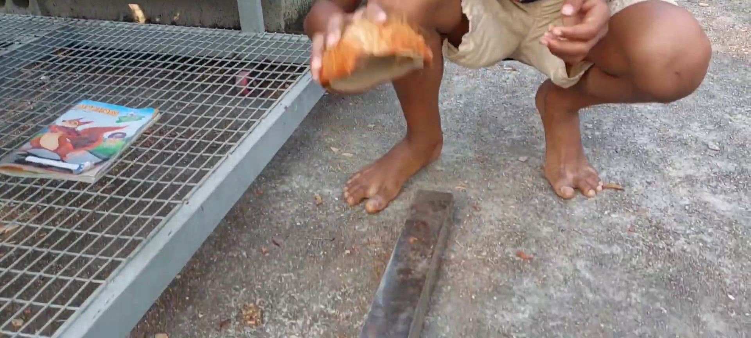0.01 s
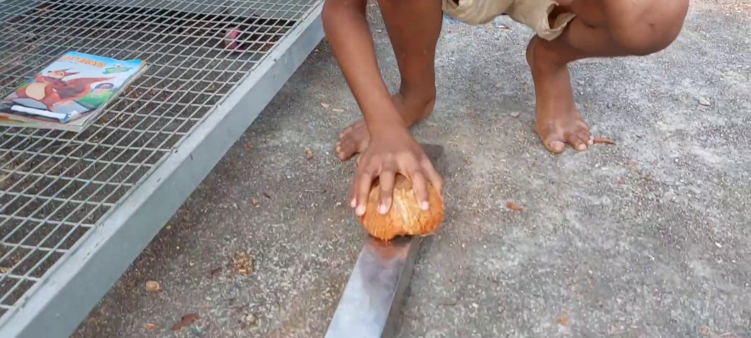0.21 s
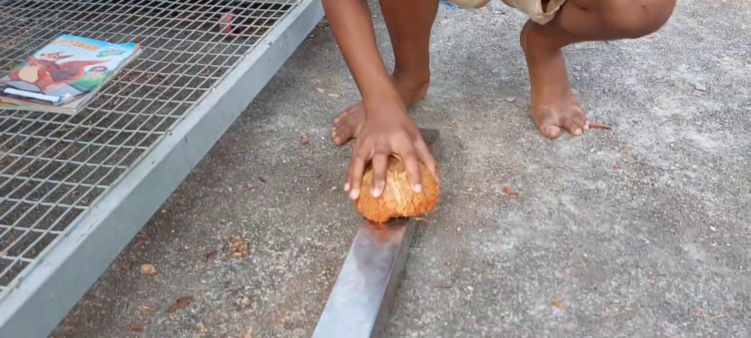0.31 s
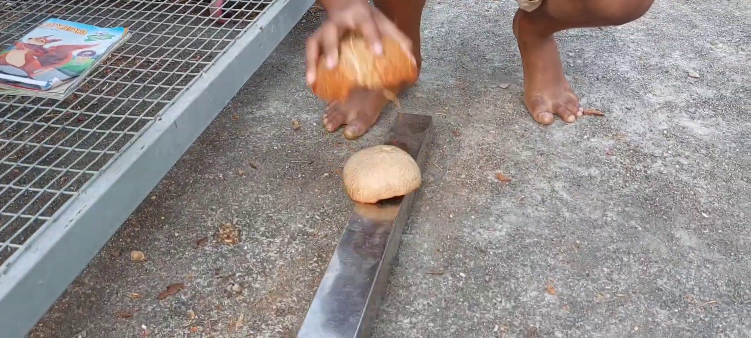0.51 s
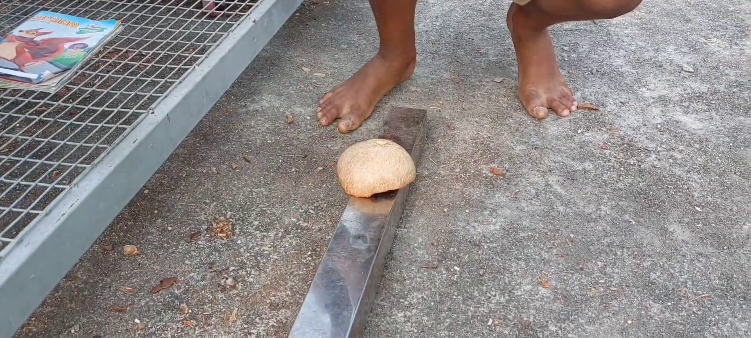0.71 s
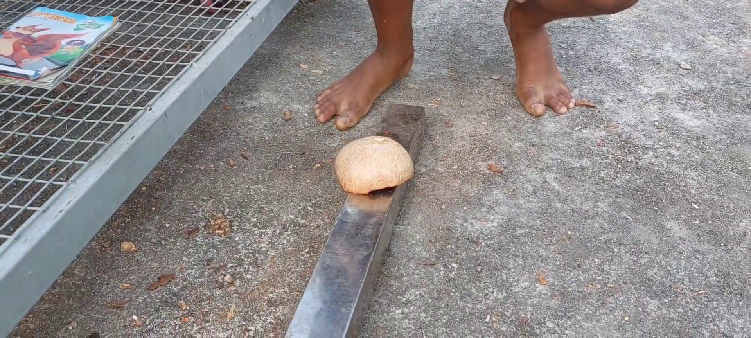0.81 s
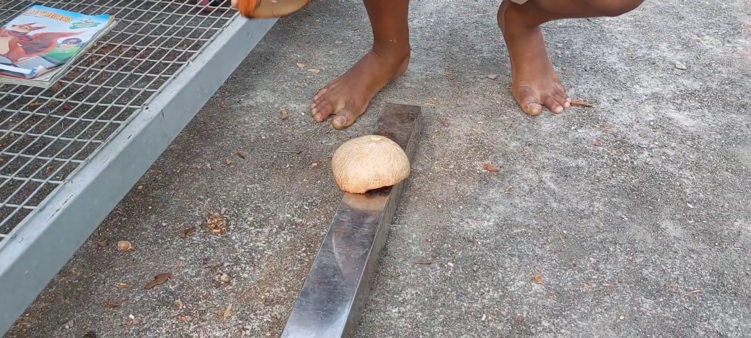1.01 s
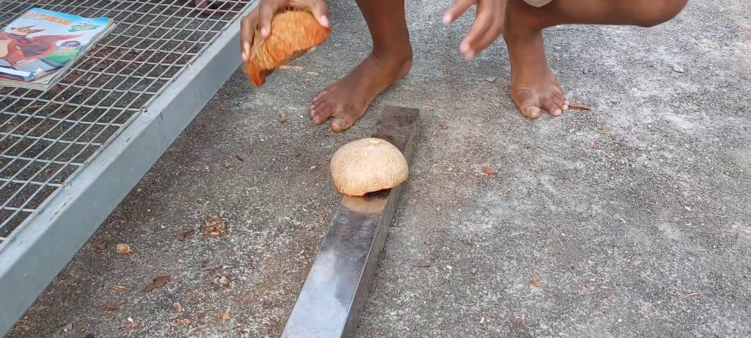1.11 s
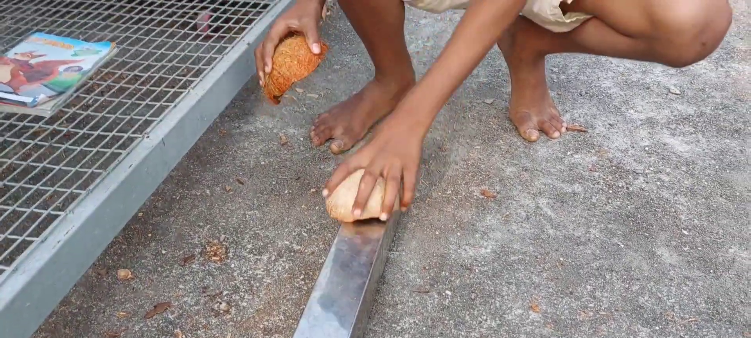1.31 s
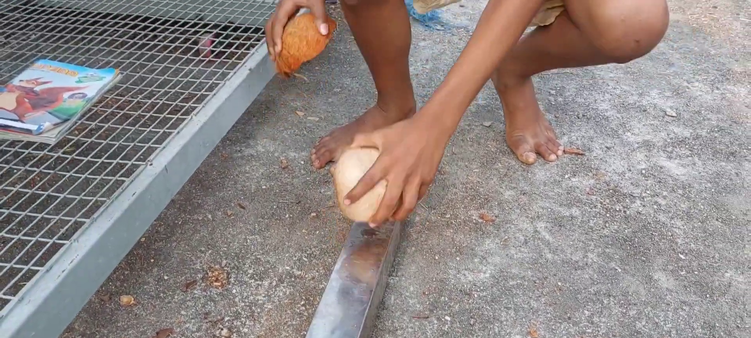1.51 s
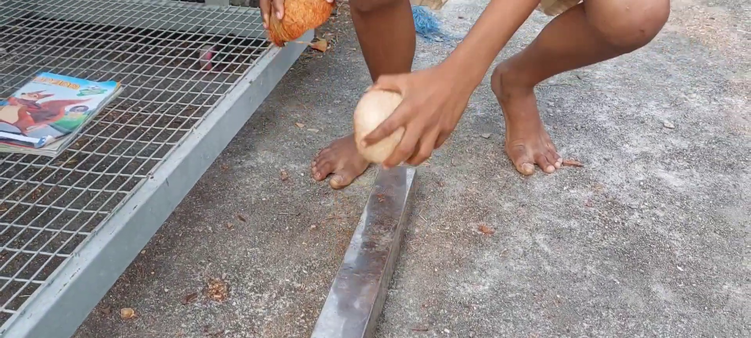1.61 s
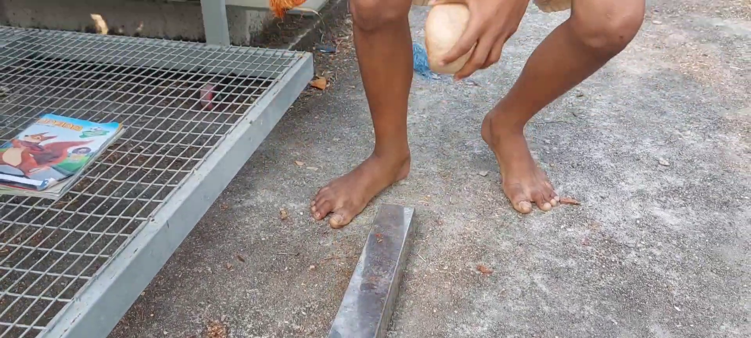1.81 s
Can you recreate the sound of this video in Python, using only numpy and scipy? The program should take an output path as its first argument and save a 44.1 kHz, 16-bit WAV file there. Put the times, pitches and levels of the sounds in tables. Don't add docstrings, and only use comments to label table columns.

```python
import sys
import numpy as np
from scipy import signal
from scipy.fft import rfft, irfft, next_fast_len
from scipy.io import wavfile

SR = 44100
rng = np.random.default_rng(int(sys.argv[2]) if len(sys.argv) > 2 else 0)


def nominal_scale(level):
    x = np.asarray(level, float) / 20
    return 10 ** x


def master_out(mix):
    frames = np.transpose(np.atleast_2d(mix))
    ceiling = np.clip(frames, -1, 1)
    pcm = np.round(ceiling * 32767).astype(np.int16)
    wavfile.write(sys.argv[1], SR, pcm)


N = 81585

BLOW_S, BLOW_DB = .2078, -0.98
CRUSH_S = .012
CRACK_DB = -5.5
YARD_DB, YARD_STRETCH = -23.5, 3.7
MODE_GAP_HZ, MODE_FROM_HZ, MODE_SHARE = 70, 2800, .4
SNAP_DB, SNAP_S, SNAP_HZ = -8.5, .004, 5500
TWIN_SHARE, TWIN_RISE_S, TWIN_FADE_S = .9, .03, .12
AIR_DB, RUSTLE_DB = -68.5, 1.34
HUM_HZ, HUM_WIDTH_HZ = 792, 5
RUMBLE_LEFT_DB = 8
CLIP = 1.0

# pitch_hz, level_db, ring_s, left_db
EARLIER_RING = [(942, -75, 5, 2), (1098, -72, 1.2, 3), (1470, -82, 5, 0), (2535, -47, 1.7, 17),
                (2875, -66, .8, 3), (3278, -67, 1.8, 11), (3742, -71, 1.6, 13), (4243, -74, 1.4, -9)]
# pitch_hz, level_db
AIR_TONE = [(15, -34), (25, -9.5), (133, 1), (651, -22), (807, -1), (875, -15.5), (1960, -14.5),
            (2700, -20.5), (3200, -26.5), (4000, -21.5), (15600, -29)]
# pitch_hz, left_db
AIR_LEFT = [(60, 17.5), (300, -6), (1000, -3), (4000, -0.4), (12000, 3)]
# pitch_hz, likeness (1 = same, -1 = opposite)
AIR_ALIKE = [(60, 0.78), (240, 0.98), (950, 1), (3770, -0.03), (15000, -0.052)]
# time_s, level_db
RUMBLE_SWELL = [(0.0, -85), (0.154, -87), (0.291, -57.5), (0.694, -74.5), (0.906, -76.5), (1.308, -81.5),
                (1.508, -74.5), (1.741, -64), (1.79, -58), (1.85, -59)]
# pitch_hz, width_hz, level_db
RUMBLE_NOTES = [(66.3, 87, -1.5), (131, 21, -2.5), (246, 82, -4.5)]
# time_s, level_db
CROW_SWELL = [
    (0, -106),
    (.15, -78.5),
    (0.599, -66),
    (1.0, -73),
    (1.4, -71.5),
    (1.6, -66.5),
    (1.85, -58),
]
# pitch_hz, width_hz, level_db
CROW_THROAT = [(1250, 210, -4.5), (1310, 29, -11.5), (1830, 250, -2.5), (1943, 45, -1), (2047, 45, -6.5),
               (1056, 240, -11.5)]
# time_s, level_db
HUM_SWELL = [(0, -103), (0.088, -94), (.14, -71.5), (0.75, -65), (.96, -70.5), (1.02, -86), (1.08, -66.5),
             (1.179, -72), (1.22, -78), (1.27, -63.5), (1.42, -72.5), (1.58, -65.5), (1.672, -80.5),
             (1.8, -70)]
# time_s, level_db
CALL_SWELL = [
    (0, -110),
    (0.859, -100),
    (0.919, -73),
    (1.05, -70),
    (1.18, -75),
    (1.3, -78),
    (1.36, -100),
    (1.85, -110),
]
# pitch_hz, width_hz, level_db
CALL_NOTES = [(1346, 9.7, 1.45), (1437, 14, -4.5)]
# time_s, level_db
DRONE_SWELL = [(0, -80), (0.088, -87.5), (.13, -70), (.2, -71), (.45, -68.5), (.6, -81), (1.85, -93.5)]
# pitch_hz, width_hz, level_db
DRONE_NOTES = [(252, 33, 1.35), (1380, 15, -4)]
TUBE_HZ = [1536, 1675, 2217, 2383, 2408, 2536, 2541, 2693, 2877, 3276, 3499, 4244, 4350]
# level_db, ring_s, left_db
TUBE_RING = [(-20.5, .42, 5.5), (-14, .3, -0.5), (-14, 0.47, -1.5), (-17, 0.6, 7.5), (-16.5, 0.24, 3),
             (-26.5, 1.378, 12.5), (-26.5, 0.31, -9), (-24, 0.49, -1.16), (-33, 1.0, -2), (-21.5, 0.29, -3),
             (-28.5, .42, -5), (-38, 1.0, -7.5), (-33, 0.49, -0.8)]
# pitch_hz, level_db, ring_s, beat_hz, silent_moment_s, gain_when_freed_db
TWINS = [(1100, -24, .66, 14.3, .43, 0), (3742, -29, .66, 11.5, .412, 10)]
# pitch_hz, level_db, ring_s, left_db
SHELL = [(286, -33, .4, 3), (867, -33, .25, 4), (1149, -25, .26, 2.5), (1430, -22, .17, .5),
         (1785, -19, .2, 0), (1857, -14, .25, -3), (1940, -15, .22, -2), (2035, -21, .22, 0),
         (2133, -15.5, .3, 1.5), (2273, -14, .24, 1.5), (3058, -25, .23, 0), (3783, -22, .3, 0)]
# pitch_hz, level_db (per Hz)
CRACK_TONE = [(60, -30.5), (130, -21.5), (400, -27.5), (950, -13), (1920, -3), (7000, -16.5), (10000, -26),
              (14500, -19)]
# pitch_hz, ring_s
CRACK_RING = [(50, 0.25), (300, 0.085), (700, .09), (1200, 0.13), (2500, 0.25), (5000, 0.15), (8500, 0.16),
              (10200, 0.06), (12000, 0.097), (15000, 0.1)]
# pitch_hz, left_db
CRACK_LEFT = [(60, 12.5), (250, 6), (500, 7), (2000, 0.5), (8000, 2), (14000, -12)]
# pitch_hz, likeness (1 = same, -1 = opposite)
CRACK_ALIKE = [(40, 0.315), (120, -0.11), (300, 0.98), (1000, 0.046), (4000, -0.58), (14000, 1)]
# pitch_hz, level_db, ring_s, left_db
KNOCK = [(1000, -14, .025, -2), (1750, -2, .022, 0), (6900, -11, .03, 0)]
# pitch_hz, level_db, ring_s, left_db
LINGER = [(576, -31, .2, -8), (676, -39, .42, -9), (5813, -28, .48, 0)]
# pitch_hz, level_db, ring_s, left_db
THUD = [(58, -14, .075, 1), (275, -14, .05, 8), (480, -24, .04, -6), (670, -17, .05, -9),
        (890, -19, .05, 5)]
# pitch_hz, level_db, ring_s, left_db
PUFF = [(71, -17, 0.034, 0.5), (110, -9.5, 0.059, 1.5)]
# pitch_hz, level_db, ring_s, left_db
BRIGHT = [(3900, -29, .4, 0), (5000, -24, .26, -3.5), (5577, -25.5, .17, -0.5), (6180, -25, .22, 3),
          (6620, -18.5, .12, 1), (7140, -20, .18, -2), (7260, -19.5, .16, 2.5), (8040, -21.5, 0.33, -4),
          (8570, -24, .15, -2.5), (8940, -27, .17, 0), (10600, -32, .15, -5.5), (12500, -30, .12, -7),
          (14348, -24, 0.11, -10)]
# pitch_hz, level_db, ring_s, left_db
GROUND = [(150, -40.5, .5, 3), (215, -39, 0.51, -3), (254, -38.5, 0.29, -4), (775, -33, .22, 2),
          (820, -36, 0.31, 4), (959, -32, 0.2, -2), (1015, -32, .3, -1.5)]
# start_s, length_s, level_db, centre_hz, width_octaves (to each side)
RUSTLE = [(.726, 0.015, -71.5, 8000, 0.3), (1.105, 0.045, -71.5, 4530, 0.11), (1.115, 0.12, -66, 4460, .03),
          (1.115, .2, -70.5, 10040, 1), (1.12, 0.19, -71, 7190, .5), (1.125, 0.095, -68.5, 4156, .15),
          (1.15, 0.071, -72, 3790, 0.039), (1.16, 0.142, -66, 4095, 0.16), (1.18, .18, -75, 6380, 0.035),
          (1.235, 0.035, -71, 8986, 0.91), (1.25, 0.98, -74, 9320, 0.98), (1.26, 0.15, -73.5, 4170, 0.16),
          (1.345, .03, -76, 10900, .8), (1.6, .025, -74, 11000, .8), (1.67, .02, -70, 10950, 0.79),
          (1.685, 0.088, -65.5, 4813, 0.86), (1.7, 0.034, -62, 12490, .5), (1.72, 0.16, -71.5, 3700, 0.066),
          (1.748, 0.19, -69.5, 4640, .6), (1.825, .03, -66, 7580, .15), (1.828, 0.0298, -69, 3050, 0.05)]


def rms_one(x):
    return x / np.sqrt(np.mean(x ** 2) + 1e-20)


def in_time(rows):
    s, db = np.transpose(rows)
    return np.interp(np.arange(N) / SR, s, db)


def at_hz(points, hz):
    table = np.array(points)
    return np.interp(np.log(hz), np.log(table[:, 0]), table[:, 1])


def pan(left_db):
    return nominal_scale(np.array([[.5], [-.5]]) * left_db)


def stereo(pair, alike):
    alike = np.clip(alike, -.95, .95)
    return np.sqrt(1 + alike) * pair[0] + np.sqrt(1 - alike) * pair[1] * [[1], [-1]]


def drift(rate_hz):
    r = np.exp(-80 * np.pi * rate_hz / SR)
    noise = rng.standard_normal(N // 40 + 2002)
    slow = signal.lfilter([1], [1, -2 * r, r * r], noise)[2000:]
    return np.interp(np.arange(N) / 40, np.arange(len(slow)), rms_one(slow))


def narrow(hz, width_hz):
    r = np.exp(-np.pi * width_hz / SR)
    top, bottom = [1, 0, -1], [1, -2 * r * np.cos(2 * np.pi * hz / SR), r * r]
    noise = rng.standard_normal((2, N + SR))
    once = signal.lfilter(top, bottom, noise)
    return rms_one(signal.lfilter(top, bottom, once)[:, SR:])


def band_pass(x, low_hz, high_hz):
    return signal.sosfilt(signal.butter(2, [low_hz, high_hz], "band", fs=SR, output="sos"), x)


def bands(octaves, white):
    edges = 25 * 2 ** np.arange(0, 9.5, octaves)
    for k, (low, high) in enumerate(zip(edges, edges[1:])):
        yield np.sqrt(low * high), band_pass(white[k % 2], low, high)


def strike(modes, start_s, rise_s, spread):
    out, start = np.zeros((2, N)), max(int(start_s * SR), 0)
    draws = rng.uniform(-0.96, 1, (len(modes), 2))
    for (hz, db, ring_s, left_db), (p, q) in zip(modes, draws):
        stop = min(N, start + int(2 * ring_s * SR))
        t = np.maximum(np.arange(start, stop) / SR - start_s, 0)
        swell_in = 1 - np.exp(-t / rise_s)
        phase = np.pi * p + spread * q * np.array([[.5], [-.5]])
        level = nominal_scale(db - 60 * t / ring_s) * pan(left_db) * swell_in
        out[:, start:stop] += level * np.sin(2 * np.pi * hz * t + phase)
    return out


def earlier_ring():
    return strike(EARLIER_RING, -.05, .001, spread=.8) * (np.arange(N) < BLOW_S * SR)


def air():
    out = 0
    for hz, noise in bands(.5, rng.standard_normal((2, 2, N))):
        level = nominal_scale(at_hz(AIR_TONE, hz) + 0.98 * drift(10))
        out = out + level * pan(at_hz(AIR_LEFT, hz)) * stereo(noise, at_hz(AIR_ALIKE, hz))
    return nominal_scale(AIR_DB) * rms_one(out)


def far(notes, swell, flutter_db, left_db):
    out = 0
    for hz, width_hz, db in notes:
        out = out + nominal_scale(db + flutter_db * drift(28)) * narrow(hz, width_hz)
    return nominal_scale(in_time(swell)) * pan(left_db) * out


def hum():
    flutter, tone = nominal_scale(1.5 * drift(28)), narrow(HUM_HZ, HUM_WIDTH_HZ)
    strength = np.abs(signal.hilbert(tone, next_fast_len(N))[:, :N])
    return nominal_scale(in_time(HUM_SWELL) + 3) * flutter * tone / strength


def distant():
    out = far(RUMBLE_NOTES, RUMBLE_SWELL, 3.5, RUMBLE_LEFT_DB)
    out = out + far(CROW_THROAT, CROW_SWELL, 0.8, .1) + hum()
    return out + far(CALL_NOTES, CALL_SWELL, 2.5, .1) + far(DRONE_NOTES, DRONE_SWELL, 2.5, .1)


def twins():
    t, out = np.arange(N) / SR, 0
    since = np.maximum(t - BLOW_S, 0)
    for hz, db, ring_s, beat_hz, free_s, freed_db in TWINS:
        late = t - free_s
        share = TWIN_SHARE * np.exp(np.where(late > 0, -late / TWIN_FADE_S, late / TWIN_RISE_S))
        freed = freed_db * np.clip(late / TWIN_RISE_S, 0, 1)
        level = nominal_scale(db - 60 * since / ring_s + freed) * (t > BLOW_S)
        first, second = np.sin(2 * np.pi * hz * late), np.sin(2 * np.pi * (hz + beat_hz) * late)
        out = out + level * (first - share * second)
    return out


def ringing():
    tube = [(hz, *rest) for hz, rest in zip(TUBE_HZ, TUBE_RING)]
    long_notes = strike(tube, BLOW_S, 0.0056, spread=1.0) + twins()
    return nominal_scale(BLOW_DB) * (long_notes + strike(SHELL, BLOW_S, 0.003, spread=3.4))


def wall_modes():
    hz = np.arange(N // 2 + 1) * SR / N
    line = (rng.random(len(hz)) < SR / N / MODE_GAP_HZ) * np.sqrt(MODE_GAP_HZ * N / SR)
    share = MODE_SHARE * (hz > MODE_FROM_HZ)
    noise = rfft(rng.standard_normal((2, 2, N)))
    return irfft(noise * (np.sqrt(share) * line + np.sqrt(1 - share)), N)


def crack():
    t = np.arange(N) / SR - BLOW_S
    after, out = np.maximum(t - CRUSH_S, 0), 0
    for hz, noise in bands(.4, wall_modes()):
        fall_db = -60 * after / at_hz(CRACK_RING, hz)
        fall = nominal_scale(fall_db) + nominal_scale(YARD_DB + fall_db / YARD_STRETCH)
        level = nominal_scale(at_hz(CRACK_TONE, hz)) * pan(at_hz(CRACK_LEFT, hz))
        out = out + level * stereo(noise, at_hz(CRACK_ALIKE, hz)) * fall
    start = int(BLOW_S * SR)
    onset = np.clip(t / .0006, 0, 1)
    return nominal_scale(CRACK_DB) * out * onset / np.std(out[:, start:start + 900])


def contact():
    knock = strike(KNOCK, BLOW_S, .0001, spread=.3) + strike(LINGER, BLOW_S, .001, spread=2.5)
    return knock + strike(THUD, BLOW_S, 0.00049, spread=1.5)


def puff():
    return strike(PUFF, BLOW_S, 0.00079, spread=0.56) * [[1], [-1]]


def bright_walls():
    return strike(BRIGHT, BLOW_S, 0.00046, spread=5.0)


def snap():
    t = np.arange(N) / SR - BLOW_S
    treble = signal.butter(2, SNAP_HZ, "high", fs=SR, output="sos")
    bright = signal.sosfilt(treble, rng.standard_normal((2, N)))
    return nominal_scale(SNAP_DB) * pan(-5.0) * bright * (t > 0) * np.exp(-np.maximum(t, 0) / SNAP_S)


def ground():
    return strike(GROUND, BLOW_S, 0.0027, spread=3.0)


def rustle():
    out, t = 0, np.arange(N) / SR
    grain = rng.standard_normal((2, N)) * nominal_scale(1.5 * drift(70))
    for start_s, length_s, db, hz, octaves in RUSTLE:
        brush = band_pass(grain, hz * 2 ** -octaves, min(hz * 2 ** octaves, .45 * SR))
        progress = np.clip((t - start_s) / length_s, 0, 1)
        out = out + nominal_scale(db) * np.sin(np.pi * progress ** 0.62) * rms_one(brush)
    return nominal_scale(RUSTLE_DB) * out * pan(-1.92)


def scene():
    blow = ringing() + crack()
    background = distant() + earlier_ring()
    blow = blow + contact() + puff() + bright_walls()
    background = background + air()
    hand = rustle()
    blow = blow + snap() + ground()
    return blow + background + hand


def top_cut(x):
    return signal.sosfilt(signal.butter(12, 15770, fs=SR, output="sos"), x)


def record(dry):
    thin = signal.sosfilt(signal.butter(2, 40.0, "high", fs=SR, output="sos"), dry)
    clipped = thin / (1 + np.abs(thin / CLIP) ** 8) ** (1 / 8)
    return top_cut(clipped)


dry = scene()
out = record(dry)
master_out(out)
```